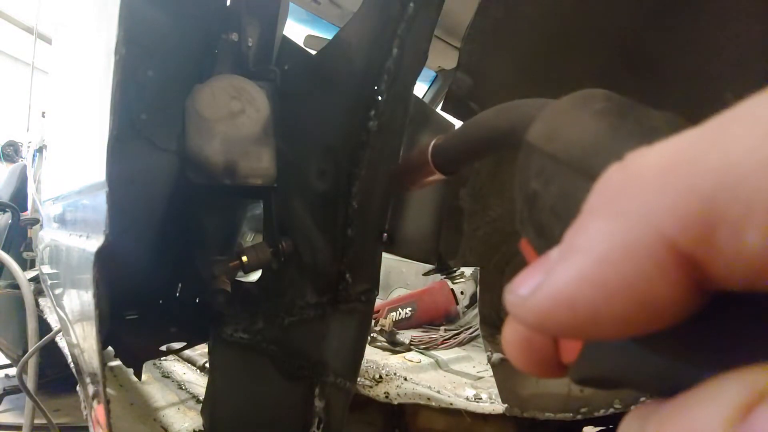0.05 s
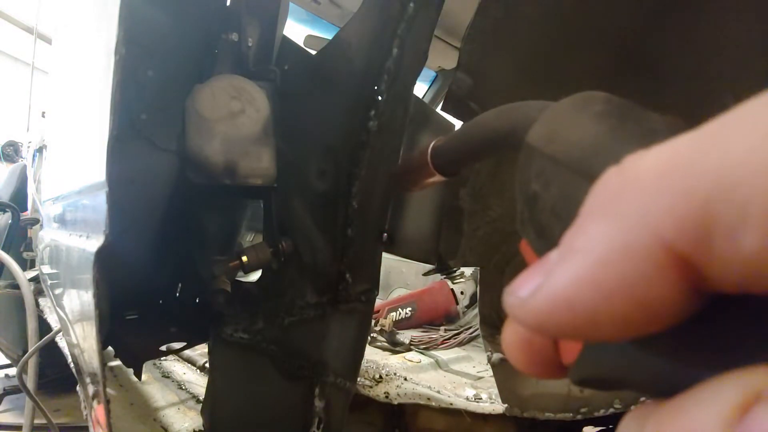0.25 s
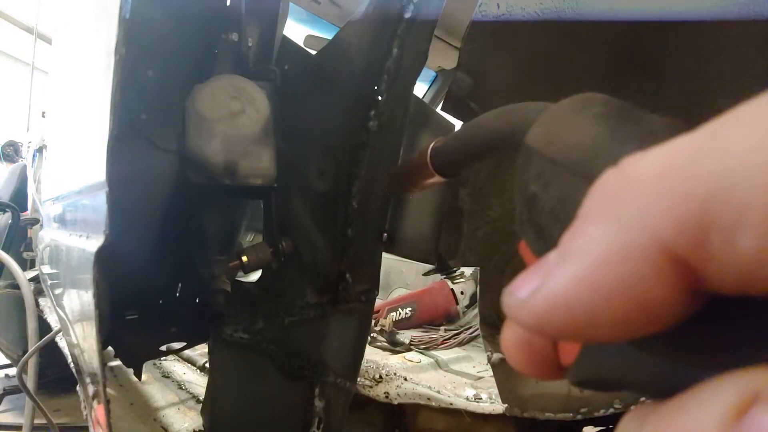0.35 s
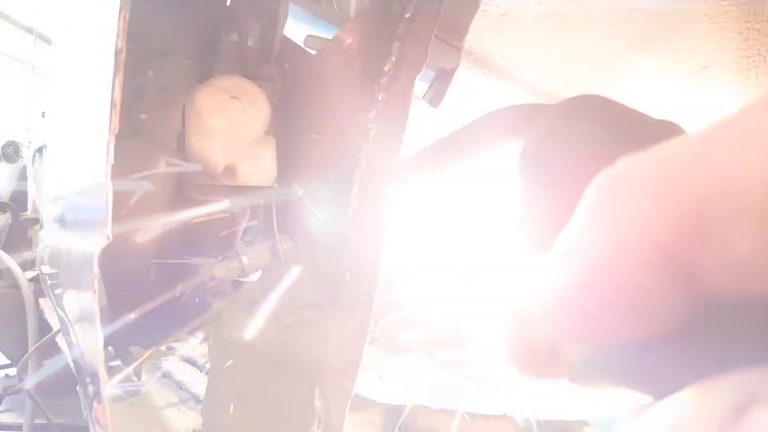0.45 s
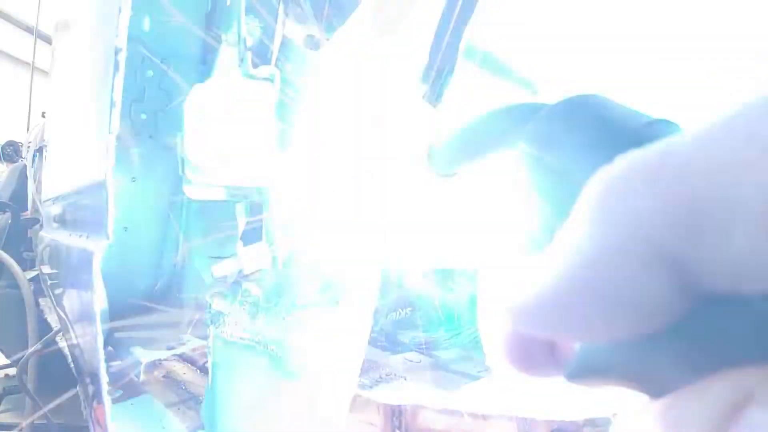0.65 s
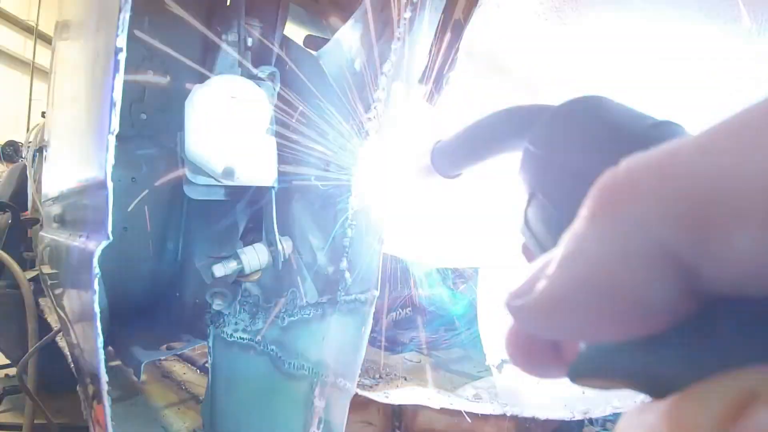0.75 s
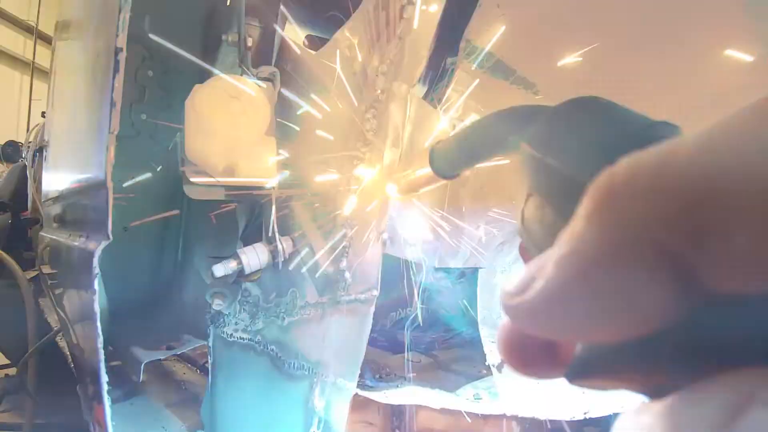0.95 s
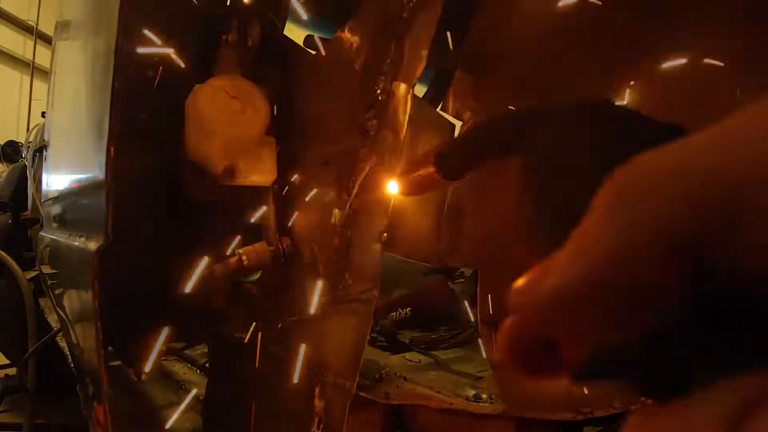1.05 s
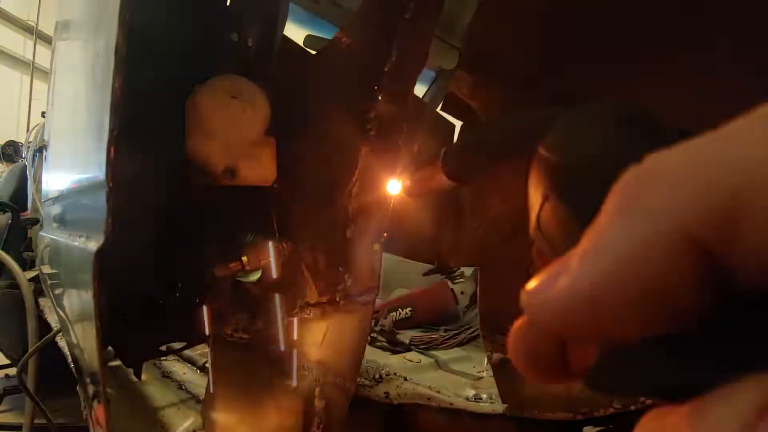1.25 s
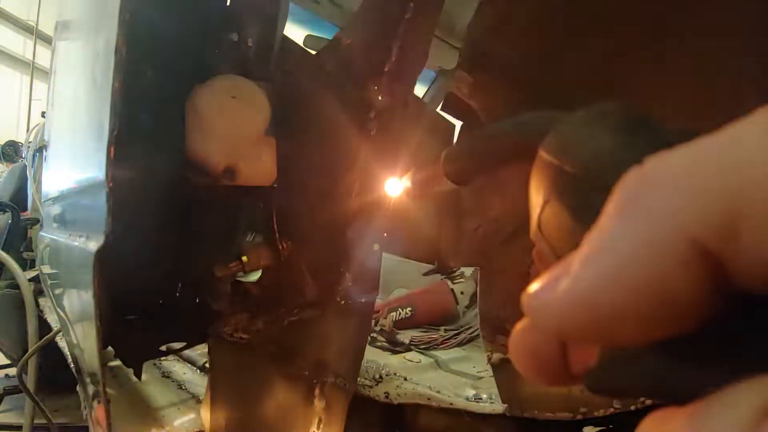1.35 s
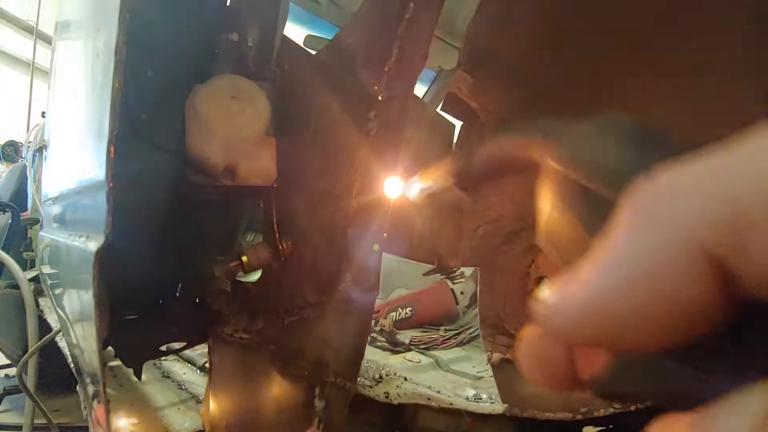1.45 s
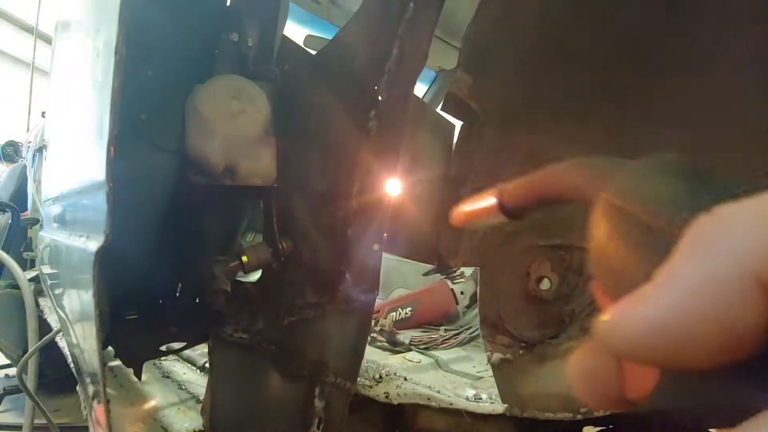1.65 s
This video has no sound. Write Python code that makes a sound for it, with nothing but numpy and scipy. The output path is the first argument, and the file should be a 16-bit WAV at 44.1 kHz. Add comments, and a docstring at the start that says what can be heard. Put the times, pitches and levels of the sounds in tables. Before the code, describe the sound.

Arc welding on sheet metal: a click, hissing gas, then rapid sharp crackling in a garage.

```python
"""A MIG gun tacks rusty sheet metal in a garage, an arm's length from the microphone.
Over an electrical hum the trigger clicks and shielding gas hisses. The wire stutters, then the arc
crackles in two quick runs, each snap rattling between the panels. Gain control ducks the hum,
which swells back as the gas bleeds away."""
import sys
import numpy as np
from scipy import signal
from scipy.fft import rfft, irfft, next_fast_len
from scipy.io import wavfile
from scipy.ndimage import uniform_filter1d

SR = 44100
rng = np.random.default_rng(int(sys.argv[2]) if len(sys.argv) > 2 else 0)


def dump(signal):
    """Clip the signal to [-1, 1] and save it as 16-bit WAV at the path in sys.argv[1]."""
    limited = np.clip(np.atleast_2d(signal).T, -1, 1)
    pcm = np.round(limited * 32767).astype(np.int16)
    wavfile.write(sys.argv[1], SR, pcm)


N = 74970
T = np.arange(N) / SR


def undb(db):
    """Decibels to gain."""
    return 10 ** (np.asarray(db) / 20)


def pan(left_db, right_db):
    """Stereo gain pair."""
    return undb([[left_db], [right_db]])


def unit(x):
    """Scale to rms 1."""
    return x / np.sqrt(np.mean(x ** 2))


def colour(x, points):
    """Minimum-phase filter through (Hz, dB) points."""
    hz, db = np.array(points, float).T
    size = 2 * next_fast_len(N)
    grid_hz = np.maximum(np.arange(size // 2 + 1) * SR / size, 1)
    cepstrum = irfft(np.log(undb(np.interp(np.log(grid_hz), np.log(hz), db))))
    cepstrum[1:size // 2] *= 2
    cepstrum[size // 2 + 1:] = 0
    return irfft(rfft(x, size) * np.exp(rfft(cepstrum)))[..., :N]


def cut(x, kind, hz, order):
    """Low- or high-pass filter."""
    return signal.sosfilt(signal.butter(order, hz, kind, fs=SR, output="sos"), x)


def ring(x, hz, width_hz):
    """One resonance, gain 1 at centre."""
    return signal.lfilter(*signal.iirpeak(hz, hz / width_hz, fs=SR), x)


def fade(start_s, decay_s):
    """Sudden onset, exponential decay."""
    return (T >= start_s) * np.exp(-np.maximum(T - start_s, 0) / max(decay_s, 1 / SR))


def walk(rate_hz):
    """Random drift, spread near 1."""
    return np.interp(T * rate_hz, np.arange(N), rng.standard_normal(N))


def stereo_noise(side_db):
    """Partly correlated left and right noise."""
    mid, side = rng.standard_normal((2, N))
    return unit(mid + undb(side_db) * side * np.array([[1], [-1]]))


def echoes(x, decay_s, side_db):
    """Dense decaying reflections, flat spectrum, unit energy gain."""
    tail = stereo_noise(side_db) * fade(0, decay_s) * (1 - fade(0, decay_s / 10))
    spectrum = rfft(tail)
    spectrum /= np.sqrt(uniform_filter1d(np.abs(spectrum) ** 2, size=1200))
    return signal.fftconvolve(np.atleast_2d(x), irfft(spectrum, N), axes=-1)[:, :N]


def excess_db(x, window_s, threshold_db):
    """Short-term level above a threshold."""
    window = max(int(window_s * SR), 2)
    power = np.maximum(uniform_filter1d(np.mean(x ** 2, axis=0), window), 1e-12)
    return uniform_filter1d(np.maximum(10 * np.log10(power) - threshold_db, 0), window // 2)


def garage():
    """Wavering electrical hum over moving air and low rumble."""
    # Hum partials. Each row: frequency in Hz, relative level in dB.
    partials = [(221, -53), (290, -60), (504.5, -45), (1174, -57.5), (2056, -55.5)]
    # Air spectrum. Each row: frequency in Hz, gain in dB.
    air_eq = [(20, -9.5), (55, 5), (90, 0), (150, -3), (230, -1.5), (340, -13), (600, -8), (850, -9.5),
              (1200, -7), (2000, -7.5), (3000, -20), (5000, -23.5), (7000, -34.5), (9000, -37.5),
              (11500, -30.5), (16000, -54)]
    waver_db, pitch_drift = 2.55, 0.0034
    clock_s = np.cumsum(1 + pitch_drift * walk(rate_hz=6.4)) / SR
    hum = np.zeros(N)
    for hz, db in partials:
        amplitude = np.sqrt(2) * undb(db + waver_db * walk(rate_hz=3.4))
        hum += amplitude * np.sin(2 * np.pi * (hz * clock_s + rng.random()))
    air = undb(-41.5) * unit(colour(stereo_noise(side_db=-2), air_eq))
    rumble = undb(-44) * unit(ring(rng.standard_normal(N), hz=50, width_hz=34))
    return hum * pan(2, -3) + air + rumble * pan(-14, 0)


def low_thumps():
    """Low thumps on the right: a handling knock at the trigger, then two gas puffs."""
    # Thumps. Each row: start in seconds, relative level in dB.
    hits = [(0.213, -28), (0.472, -7), (0.986, 1.5)]
    thump_hz, decay_s = 58, 0.0041
    thumps = np.zeros(N)
    for start_s, db in hits:
        thumps -= undb(db) * fade(start_s, decay_s) * np.sin(2 * np.pi * thump_hz * (T - start_s))
    return thumps * pan(-25, 0)


def shielding_gas():
    """Gas hisses and whistles in the nozzle; whistle and top fade first as flow drops."""
    # Flow envelope. Each row: time in seconds, level in dB.
    flow_curve = [(.206, -59.5), (.214, -33.5), (.27, -29), (.37, -32), (.45, -35), (.55, -34), (1.04, -49),
                  (1.15, -41.5), (1.3, -44), (1.42, -48.5), (1.57, -49), (1.7, -49)]
    # Hiss spectrum. Each row: frequency in Hz, gain in dB.
    hiss_eq = [(200, -16), (900, -5.5), (1500, 2.5), (2500, 1), (4000, -2), (6200, 4.5), (7200, -1.5),
               (10000, 7.5), (12000, -9), (14000, -5), (15500, -16)]
    full_flow_db, split_hz, whistle_hz = -33, 8640, 1774
    flow = undb(np.interp(T, *np.array(flow_curve).T) + walk(rate_hz=120))
    force = np.minimum(flow / undb(full_flow_db), 1)
    hiss = unit(colour(stereo_noise(side_db=-2.9), hiss_eq))
    body = cut(hiss, "low", split_hz, order=6)
    jet = force ** 0.49 * undb(-1.5) * cut(hiss, "high", split_hz, order=6)
    whistle = ring(rng.standard_normal(N), whistle_hz, width_hz=190)
    whistle = unit(ring(whistle, whistle_hz, width_hz=380))
    return flow * (body + jet + np.sqrt(force) * whistle * pan(-11.5, -0.5))


def trigger():
    """Trigger and gas valve: a double click."""
    # Clicks. Each row: start in seconds, relative level in dB.
    clicks = [(0.2099, -15), (.215, -17)]
    # Click spectrum. Each row: frequency in Hz, gain in dB.
    click_eq = [(40, -7), (100, -10), (230, 4), (500, -14), (900, -6), (1500, -5.5), (2100, 10.5),
                (2500, 5.5), (3000, -17), (5000, -6), (7000, -28), (12000, -6.5), (15500, -20)]
    envelope = sum(undb(db) * fade(start_s, decay_s=0.0024) for start_s, db in clicks)
    return undb(6.5) * colour(envelope * stereo_noise(side_db=-1), click_eq)


def wire_snaps():
    """Wire shorts and burns free: pressure spike, spit of metal, short rattle."""
    # Snaps. Each row: start in seconds, relative level in dB.
    snaps = [(0.4693, 4), (0.4721, -3), (0.4841, -9), (0.5708, -5), (.5888, 5), (0.626, -2), (0.6424, -5.5),
             (0.6523, 1), (.6607, -4), (0.6714, 2), (0.6817, -4.5), (0.6912, -5), (0.6999, -3.5),
             (0.7108, 2), (.7222, -6.5), (0.7333, -2), (0.747, -1), (0.7587, 3.5), (0.773, -1), (0.7856, 2),
             (0.794, 0.5), (0.8084, 1.5), (0.8194, -2.5), (0.8434, 1), (0.8555, -1), (.8683, 1.5),
             (.881, -0.5), (.8932, 2), (0.9051, -3.5), (0.9153, -3), (0.9288, -4), (0.9405, -3.5),
             (0.9506, -4), (.9621, 1), (0.9738, -1.5), (0.9855, 1.5), (0.9984, 0), (1.0118, 6), (1.0237, 1),
             (1.0344, -4.5)]
    spit_rise_s, spit_length_s = 0.0005, 0.0034
    spikes, spits, rattles = np.zeros((3, N))
    for start_s, db in snaps:
        spikes[int(start_s * SR)] += undb(db)
        rise = (T >= start_s) * (1 - fade(start_s, spit_rise_s))
        fall = np.exp(-((T - start_s) / spit_length_s) ** 4)
        spits += undb(db) * unit(rise * fall) / np.sqrt(N)
        rattles += undb(db) * unit(fade(start_s, decay_s=0.0078)) / np.sqrt(N)
    spikes = cut(spikes, "low", hz=4000, order=1)
    spits = cut(spits * stereo_noise(side_db=-2.8), "high", hz=2350, order=2)
    rattles = cut(rattles * stereo_noise(side_db=0), "high", hz=1800, order=1)
    return undb(1) * spikes + spits + undb(-7.5) * rattles


def arc():
    """Snaps and sizzle reflect between the panels; a low flutter fills the burns."""
    # Steady burns. Each row: start in seconds, end in seconds, relative level in dB.
    burns = [(0.465, .495, -26), (0.613, 0.629, -23), (0.636, 0.817, -18.5), (0.837, 1.02, -21.5)]
    # Arc spectrum. Each row: frequency in Hz, gain in dB.
    arc_eq = [(40, -3), (100, -2), (200, 8.5), (310, -4), (420, 0.5), (650, 2.5), (850, -3), (1200, 2),
              (1700, 4.5), (2500, 0), (4000, 1), (6000, 0.5), (11000, -0.5), (16000, -1)]
    # Reflections off the nearest sheets. Each row: delay in seconds, gain in dB.
    sheets = [(.0026, -21.5), (.0087, -20.5)]
    edge_s, grains_per_s = 0.014, 2700
    snaps = undb(15.5) * wire_snaps()
    burn = np.zeros(N)
    for start_s, end_s, db in burns:
        burn += undb(db) * np.clip(np.minimum(T - start_s, end_s - T) / edge_s + 0.5, 0, 1)
    grains = (rng.random(N) < grains_per_s / SR) * stereo_noise(side_db=1.1)
    sizzle = burn * unit(ring(grains, hz=4600, width_hz=9900))
    direct = colour(snaps + sizzle, arc_eq)
    early = sum(undb(db) * np.pad(direct, ((0, 0), (int(delay_s * SR), 0)))[:, :N]
                for delay_s, db in sheets)
    flutter = burn * unit(ring(stereo_noise(side_db=-13), hz=76, width_hz=90)) * pan(-20, -15)
    panels = undb(-4.5) * echoes(direct, decay_s=0.0063, side_db=1)
    return direct + early + panels + flutter


def scene():
    """The gun rings the cavity round the weld and reverberates in the garage."""
    # Cavity modes. Each row: centre in Hz, width in Hz, left gain in dB, right gain in dB.
    modes = [(746, 45, -4, 0.5), (1327, 153, -4.5, -1.5), (1635, 100, -40, -9), (4400, 90, -11, -25),
             (4540, 140, -22, -18), (6230, 77, 1.5, -10), (6500, 81, -7, -31), (6890, 280, -15, 9),
             (7090, 154, -20, 16), (12000, 580, 7.5, -18), (15540, 110, -5.5, 18)]
    # Reverb spectrum. Each row: frequency in Hz, gain in dB.
    room_eq = [(200, 3), (1000, 0), (4000, -1.5), (7000, -6), (15000, -3.5)]
    t60_s = 0.48
    gun = arc() + trigger() + shielding_gas()
    gun = gun + sum(pan(left_db, right_db) * ring(gun, hz, width_hz)
                    for hz, width_hz, left_db, right_db in modes)
    room = undb(-16.5) * colour(echoes(gun, t60_s / np.log(1000), side_db=0), room_eq)
    return gun + room + garage() + low_thumps()


def record(dry):
    """Microphone ports, slow-release gain control, peak limiter, clipping, steep top cut."""
    # Port responses. Each index: frequency in Hz, left gain in dB, right gain in dB.
    port_hz = [40, 100, 250, 1000, 2000, 3000, 4200, 6100, 7200, 7800, 8400, 9000, 9700, 11700, 13000,
               14600, 15700]
    port_left_db = [-3, 1.5, -1, 2, -3, 2, 4, 5, 0.5, -6, -15.5, -7, -3.5, -0.5, -5.5, 1.5, -7.5]
    port_right_db = [3, -0.5, 1, -2.5, 1.5, 1.5, 1.5, 1.5, 2, -3, -12.5, -24, -4.5, -4.5, 2.5, 1.5, -4.5]
    left_lag_samples, top_hz = 4, 15850
    window_s, release_s = 0.013, 0.35
    left = colour(dry[0], list(zip(port_hz, port_left_db)))
    right = colour(dry[1], list(zip(port_hz, port_right_db)))
    x = np.array([np.pad(left, (left_lag_samples, 0))[:N], right])
    over_db = excess_db(x, window_s, threshold_db=-13.5)
    over_db = np.pad(over_db, (int(window_s * SR / 2), 0))[:N]  # reacts half a window late
    recovery = np.exp(-T / release_s)
    duck_db = np.maximum.accumulate(over_db / recovery) * recovery  # decaying peak hold
    x = x * undb(-duck_db)
    limit_db = excess_db(x, window_s=0.0012, threshold_db=-11.5)
    x = np.clip(x * undb(-limit_db), -1, 1)
    return signal.sosfilt(signal.ellip(10, 0.2, 80, top_hz, fs=SR, output="sos"), x)


dry = scene()
out = record(dry)
dump(out)
```